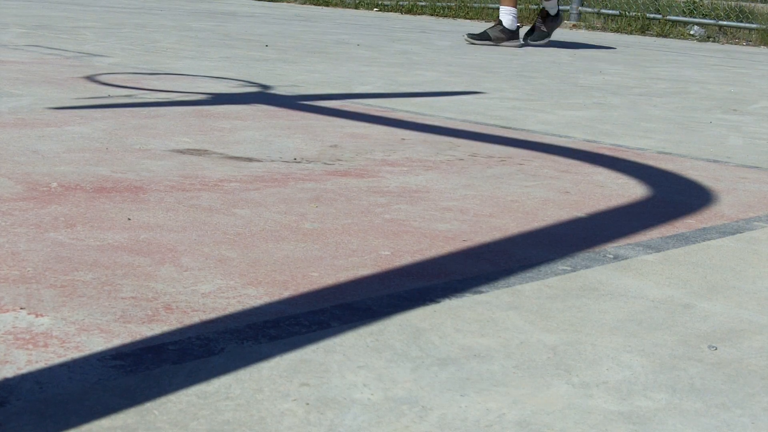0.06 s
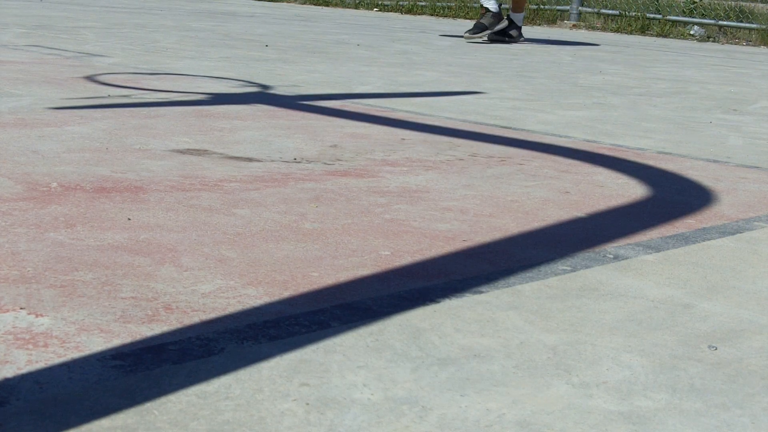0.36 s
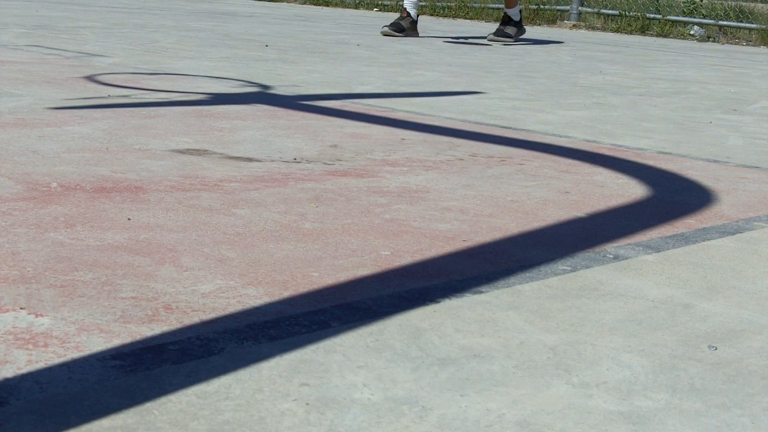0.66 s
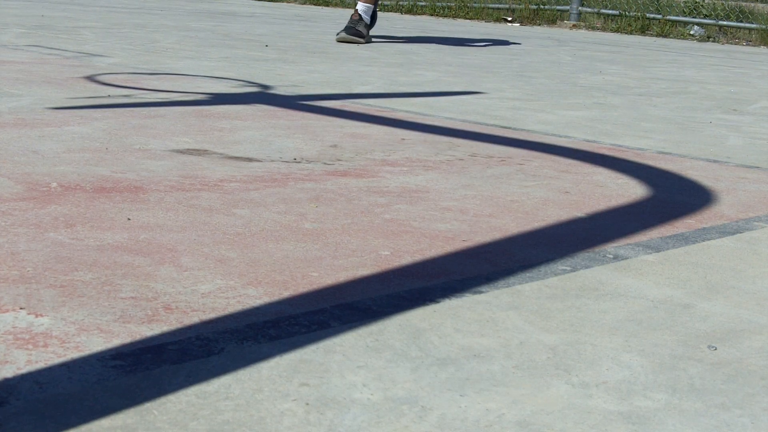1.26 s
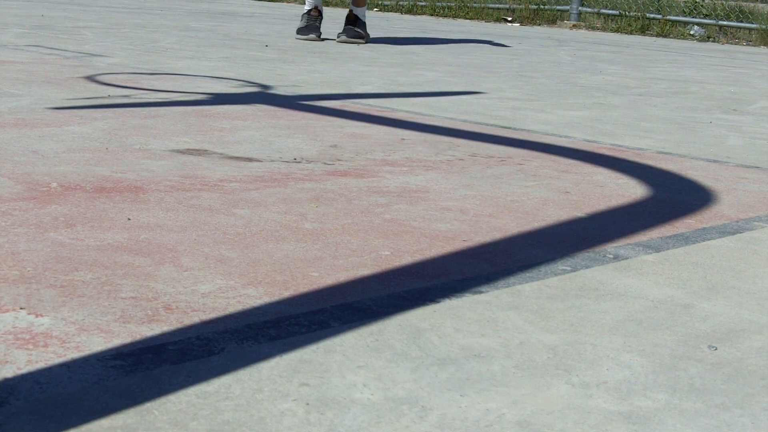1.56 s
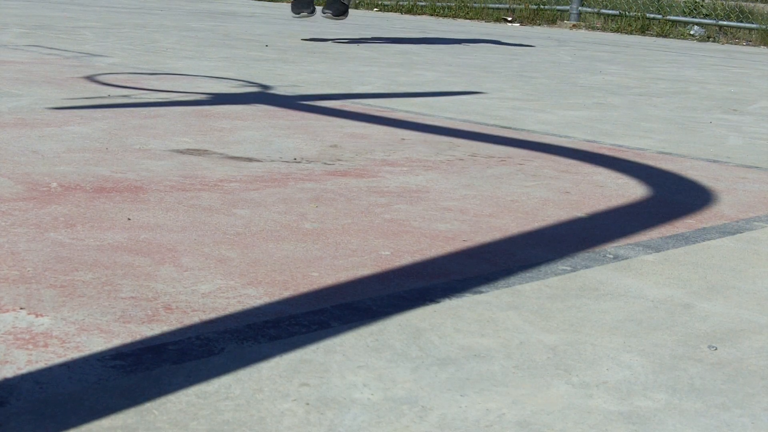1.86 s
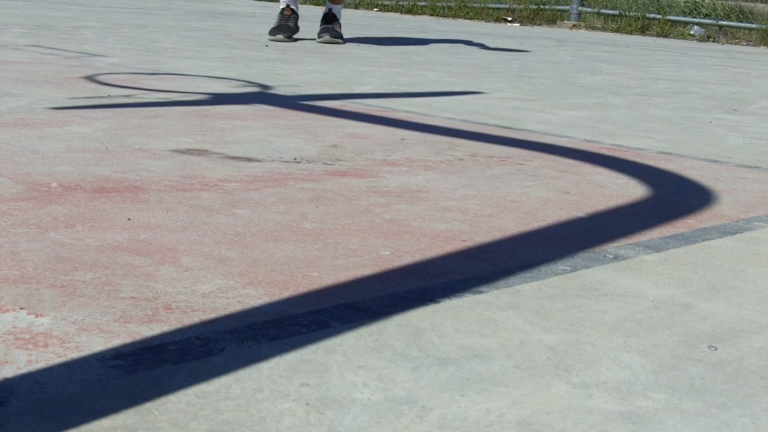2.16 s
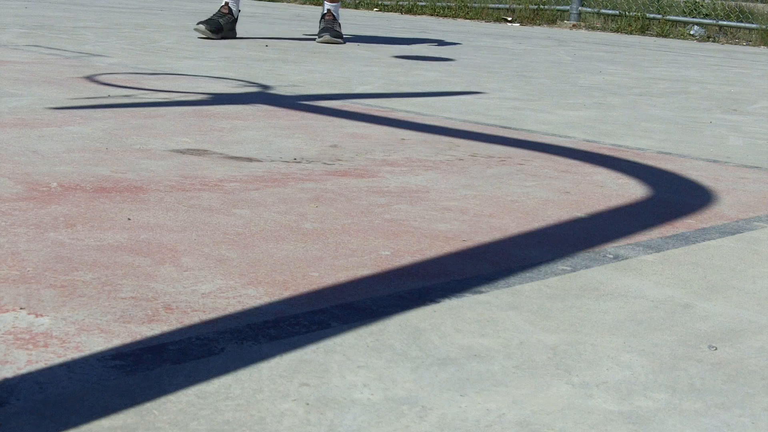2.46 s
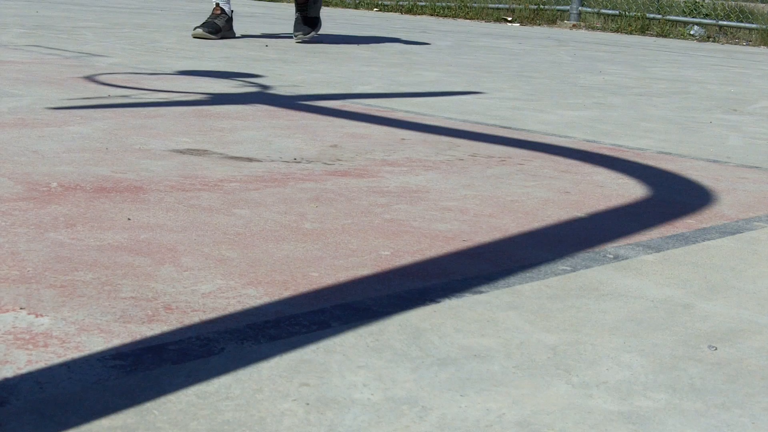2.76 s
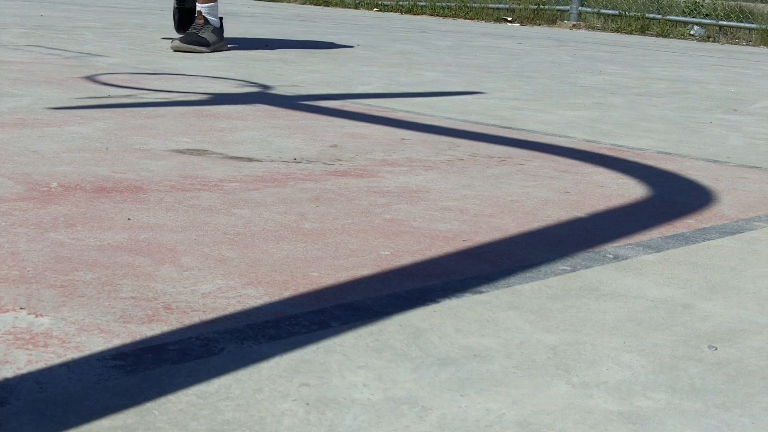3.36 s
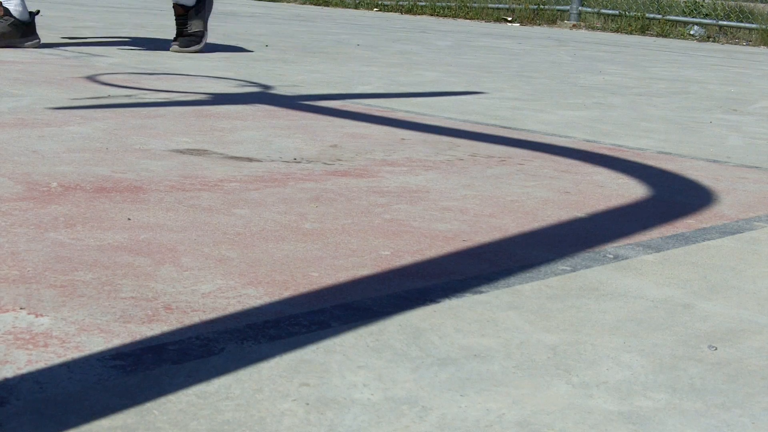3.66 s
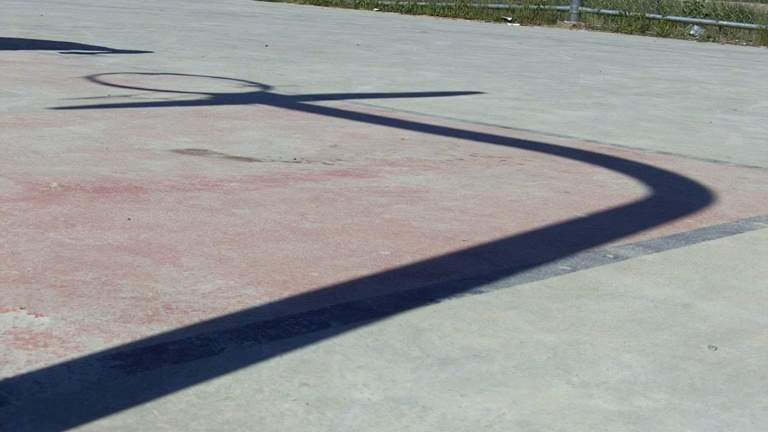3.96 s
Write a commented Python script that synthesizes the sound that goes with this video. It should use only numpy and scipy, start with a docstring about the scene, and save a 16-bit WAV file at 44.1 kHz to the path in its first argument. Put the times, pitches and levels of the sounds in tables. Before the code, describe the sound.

A basketball bounces once, then slams a backboard, leaving the rim rattling in light wind.

```python
"""An outdoor court in light wind: a player steps up, bounces a basketball once, catches it and shoots.
Each impact excites damped modes: first the skin of the ball and the air inside it, then the backboard
and its steel pole, which ring on while the loose rim rattles to and fro.
Wind buffets a nearly mono microphone whose port cuts a deep notch into the treble."""
import sys
import numpy as np
from scipy import signal
from scipy.fft import rfft, irfft, next_fast_len
from scipy.io import wavfile
from scipy.ndimage import map_coordinates

SR = 44100
rng = np.random.default_rng(int(sys.argv[2]) if len(sys.argv) > 2 else 0)


def int16_out(signal):
    """Quantize to a 16-bit WAV file."""
    q = np.round(np.clip(np.atleast_2d(signal).T, -1, 1) * 32767)
    wavfile.write(sys.argv[1], SR, q.astype(np.int16))


N = 176400
TIME = np.arange(N) / SR


def amp(db):
    """Amplitude ratio of a level in decibels."""
    return 10 ** (np.asarray(db) / 20)


def unit(x):
    """Normalisation to rms 1."""
    return x / np.sqrt(np.mean(x ** 2) + 1e-20)


def along(points, hz):
    """Interpolation of (f, value) points on a logarithmic frequency axis."""
    f, v = np.transpose(points)
    return np.interp(np.log(hz + 1), np.log(f + 1), v)


def since(s):
    """Time elapsed since s, zero before it."""
    return np.maximum(TIME - s, 0)


def wobble(rate):
    """Random modulation: a spline through rate knots a second."""
    return map_coordinates(rng.standard_normal(N // 20), [np.arange(N) * rate / SR + 2], order=3)


def filtered(x, response):
    """Linear filtering: the spectrum of x times a frequency response."""
    size = next_fast_len(N + 8192)
    return irfft(rfft(x, size) * response(np.fft.rfftfreq(size, 1 / SR)), size)[..., :N]


def noise(spectrum, shape=lambda hz: 1):
    """Spectral shaping of white noise, at rms 1: spectrum levels are relative."""
    return unit(filtered(rng.standard_normal(N), lambda hz: amp(along(spectrum, hz)) * shape(hz)))


def swells(table):
    """Gaussian envelopes from (t, level, width) rows."""
    return sum(amp(db) * np.exp(-.5 * ((TIME - s) / width) ** 2) for s, db, width in table)


def strike(s, rise, t60):
    """Exponential decay: an envelope that rises at s and falls 60 dB in t60."""
    t = since(s)
    return (1 - np.exp(-t / rise)) * np.exp(-np.log(1000) * t / t60)


def fading(s, spectrum, t60s, rise):
    """Frequency-dependent damping: each band of dense modes decays at its own rate."""
    dense, out = noise(spectrum), np.zeros(N)
    centres, times = np.transpose(t60s)
    for weights, t60 in zip(np.eye(len(times)), times):
        band = filtered(dense, lambda hz: along(np.c_[centres, weights], hz))
        out += band * strike(s, rise, t60)
    return out


def click(s, spectrum):
    """Minimum-phase pulse of peak 1, formed by folding the cepstrum."""
    size = 2048
    cepstrum = irfft(np.log(amp(along(spectrum, np.fft.rfftfreq(size, 1 / SR)))))
    cepstrum[1:size // 2] *= 2
    cepstrum[size // 2 + 1:] = 0
    pulse = irfft(np.exp(rfft(cepstrum)))
    return np.roll(np.pad(pulse / np.abs(pulse).max(), (0, N - size)), round(s * SR))


def impulses(per_s, spread_db):
    """Poisson process: impulses of random sign and log-normal size."""
    sizes = rng.choice([-1, 1], N) * amp(spread_db * rng.standard_normal(N))
    return sizes * (rng.random(N) < per_s / SR)


# wind strength (t/s, relative level/dB)
WIND_STRENGTH = [(0.0, -27), (0.03, -28.5), (0.75, -26.5), (0.78, -41), (0.81, -24.5), (1.22, -27),
                 (1.46, -33.5), (1.97, -24.5), (2.04, -33.5), (2.21, -16.5), (2.37, -34), (2.51, -22),
                 (2.55, -28.5), (2.93, -18), (3.04, -29), (3.55, -19.5), (3.59, -36.5), (4.0, -11.5)]
# buffeting (f/Hz, level/dB)
BUFFET_SPECTRUM = [(10, 10.5), (35, 2), (80, -9.5), (130, -24), (200, -27.5), (400, -45), (1200, -94)]
# single puffs on the port (t/s, level/dB, centre f/Hz)
WIND_PUFFS = [(0.149, -29, 57.6), (0.577, -29, 50.4), (1.102, -26.5, 74), (1.212, -28, 70),
              (1.951, -26.5, 53), (2.197, -16.5, 75), (2.244, -22.5, 70), (2.512, -18.5, 37),
              (2.737, -20.5, 77), (2.781, -28.5, 110.3), (2.843, -18, 162), (2.934, -38, 34),
              (3.434, -16.5, 52.5), (3.533, -16.5, 41.3), (3.75, -20, 45), (3.881, -15.5, 59.4)]

def wind():
    """Turbulent pressure at the microphone: low gusting noise and single puffs."""
    gust_db = np.interp(TIME, *np.transpose(WIND_STRENGTH)) + 1.84 * wobble(8.3) - 3.0
    out = amp(gust_db) * noise(BUFFET_SPECTRUM)
    for s, db, hz in WIND_PUFFS:
        u = (np.pi * hz * (TIME - s)) ** 2
        out += amp(db) * (1 - 2 * u) * np.exp(-u)  # Ricker wavelet
    return out


# background air (f/Hz, level/dB)
AIR_SPECTRUM = [(100, -81), (400, -86), (1000, -90), (2000, -94.5), (3500, -99), (5000, -93.5), (6200, -90),
                (8000, -102), (10000, -111), (15000, -119)]

def air():
    """Stationary broadband noise: a faint, steady hiss."""
    return amp(-53.5) * noise(AIR_SPECTRUM)


# scuffs on concrete (t/s, level/dB, width/s)
SHOE_SCUFFS = [(.04, -53, 0.036), (.44, -55.5, 0.026), (1.645, -48, 0.013), (2.215, -48.5, 0.011),
               (2.41, -56.5, 0.017)]
# grit underfoot (f/Hz, level/dB)
GRIT_SPECTRUM = [(300, -38), (2000, -5.5), (3500, -14), (6300, -0.5), (9000, -11.5), (12000, -24.5),
                 (15000, -38)]

def shoes():
    """Sliding friction: soles brush unevenly over grit."""
    return swells(SHOE_SCUFFS) * amp(1.3 * wobble(300)) * noise(GRIT_SPECTRUM)


# contact pulse, the slap after it and the distant echoes (f/Hz, level/dB)
SMACK_SPECTRUM = [(100, 2), (400, -3), (750, -3), (1200, 5), (1900, -6.5), (3500, -3), (5500, -2),
                  (8000, -22.5), (11000, -36), (15000, -47)]
SLAP_SPECTRUM = [(100, 2.5), (400, -7.5), (1100, -10), (1800, -8.5), (3500, -10), (5700, -9), (8000, -20),
                 (11000, -38), (15000, -44)]
ECHO_SPECTRUM = [(150, -6), (450, -1), (1000, -5), (1600, -15), (4000, -25), (12000, -50)]
# damping of the slap (f/Hz, T60/s)
SLAP_DECAY = [(200, 0.065), (1000, 0.056), (2500, 0.022), (8000, 0.02)]
# modes of the flexing skin and of the enclosed air (f/Hz, level/dB, T60/s)
SKIN_MODES = [(116, -9.5, 0.051), (171, -17, 0.028), (240, -16, 0.061), (415, -20.5, 0.056)]
CAVITY_MODES = [(951, -32, 0.13), (1044, -22, 0.064), (1280, -26, 0.035), (1700, -65, .2),
                (2140, -59, 0.78), (2276, -35, 0.063), (2820, -51, 0.18)]
# reflections from the surroundings (t/s, level/dB, width/s)
DISTANT_ECHOES = [(.816, -41.5, .005), (.925, -53.5, 0.022)]

def dribble(s=0.7763, smack_db=-3, slap_db=-19, echo_delay_s=0.0214):
    """Impulse excitation: the ball hits concrete, its skin and air cavity resonate, echoes follow."""
    t = since(s)
    smack = amp(smack_db) * click(s, SMACK_SPECTRUM)
    slap = amp(slap_db) * fading(s, SLAP_SPECTRUM, SLAP_DECAY, rise=0.00027)
    thump = sum(amp(db) * strike(s, 0.00066, t60) * np.cos(2 * np.pi * hz * t)
                for hz, db, t60 in SKIN_MODES)
    ring = sum(amp(db) * strike(s, 0.00077, t60) * np.sin(2 * np.pi * hz * t)
               for hz, db, t60 in CAVITY_MODES)
    near_echo = amp(slap_db - 17.5) * fading(s + echo_delay_s, SLAP_SPECTRUM, SLAP_DECAY, rise=0.001)
    far_echoes = swells(DISTANT_ECHOES) * noise(ECHO_SPECTRUM)
    return smack + slap + thump + ring + near_echo + far_echoes


# palms catching the ball (t/s, level/dB, T60/s, cutoff f/Hz)
CATCHES = [(1.303, -33, 0.052, 1320), (1.309, -44, 0.032, 1400), (1.3123, -34, 0.072, 1000)]
# pats before the shot (t/s, peak level/dB)
HAND_PATS = [(2.1972, -16), (2.202, -19.5)]
# a catch and a pat (f/Hz, level/dB)
PALM_SPECTRUM = [(100, -7), (450, 8.5), (750, -6.5), (1200, 1), (3000, -5), (6500, 3), (15000, -29)]
PAT_SPECTRUM = [(100, 7), (400, -4), (900, 3.5), (1500, -6), (2400, -14), (4000, -31), (7000, -22),
                (10000, -34), (15000, -54)]

def hands(crack_db=-19):
    """Heavily damped impacts: a dull catch with a thin crack, later two sharp pats."""
    catch = np.zeros(N)
    for s, db, t60, cutoff in CATCHES:
        palm = noise(PALM_SPECTRUM, lambda hz: 1 / (1 + (hz / cutoff) ** 6) + amp(crack_db))
        catch += amp(db) * strike(s, 0.00012, t60) * palm
    return catch + sum(amp(db) * click(s, PAT_SPECTRUM) for s, db in HAND_PATS)


# rustles of the throw (t/s, level/dB, width/s)
THROW_RUSTLES = [(2.3, -51.5, 0.022), (2.38, -54.5, 0.021)]
# rubbing cloth (f/Hz, level/dB)
CLOTH_SPECTRUM = [(300, 4), (1200, -11), (1800, 2.5), (2600, -20), (6000, -22), (12000, -38)]

def clothes():
    """Friction noise: cloth rustles faintly as the arms go up."""
    return swells(THROW_RUSTLES) * noise(CLOTH_SPECTRUM)


# the blow, then the board chattering on its mount (t/s, level/dB, T60/s, tilt/(dB per octave))
BOARD_BLOWS = [(2.9062, -9.5, 0.13, -7), (2.916, -19.5, 0.11, 3.5), (2.936, -16.5, 0.27, -2),
               (2.95, -15.5, 0.061, -1), (2.978, -19, 0.2, -3), (3.041, -23.5, 0.3, -4),
               (3.099, -24, 0.28, -1.5), (3.151, -32.5, 0.48, -6.5)]
# the struck board (f/Hz, level/dB)
CRASH_SPECTRUM = [(80, -3), (170, -9), (310, -5.5), (420, 3.5), (490, -20), (580, 4.5), (680, -7), (790, 2),
                  (930, -6.5), (1100, -1), (1480, -5), (1650, -10), (1900, 6), (2150, -9), (2500, -4.5),
                  (3600, -16), (6500, -13), (9000, -28), (15000, -55)]
HIT_S = BOARD_BLOWS[0][0]

def backboard(graze_lead_s=0.0059):
    """Broadband impact noise: the ball grazes, then slams the board, which knocks on its mount."""
    crash = np.zeros(N)
    for s, db, t60, tilt in BOARD_BLOWS:
        blow = noise(CRASH_SPECTRUM, lambda hz: amp(tilt * np.log2(np.clip(hz, 400, 2500) / 1000)))
        crash += amp(db) * strike(s, 0.00016, t60) * blow
    graze = amp(-24) * strike(HIT_S - graze_lead_s, 0.0055, 0.066) * noise(CRASH_SPECTRUM)
    return graze + crash


def modes(table, rise, waver_db, drift_rad, rate):
    """Modal superposition: damped sinusoids whose level and phase waver as the hoop shakes."""
    t, out = since(HIT_S), np.zeros(N)
    for hz, db, t60 in table:
        envelope = amp(db + waver_db * wobble(rate)) * strike(HIT_S, rise, t60)
        phase = 2 * np.pi * (hz * t + rng.random()) + drift_rad * wobble(rate)
        out += envelope * np.sin(phase)
    return out


# modes of the steel pole and of the board (f/Hz, relative level/dB, T60/s)
POLE_MODES = [(204.4, -18.5, 7.6), (241.8, -22, 2.75), (292, -30, 1.8), (418.7, -21.5, 2.4),
              (442.3, -29.5, 8.4), (481, -27.5, 12), (542, -26.5, 5.4), (595, -15.5, 2.1),
              (715, -32.5, 6.5), (800, -23.5, 2.3), (822, -43, 7.5)]
BOARD_MODES = [(1060, -29.5, 4.2), (1050, -21, 0.67), (1192, -31.5, 1.3), (1290, -30.5, 3.8),
               (1497, -32, 3.1), (1438, -25, 0.75), (1840, -25, 0.78), (1820, -42, 1.254),
               (1904, -18, 0.98), (2010, -39, 1.2), (1957, -37.5, 6.1), (2428, -31.5, 3.1),
               (2655, -49, 2.8)]
# dense modes of the whole frame (f/Hz, level/dB) and their damping (f/Hz, T60/s)
FRAME_SPECTRUM = [(100, 6), (170, 3), (330, -9.5), (600, 2), (820, 8.5), (950, -4.5), (1300, 8),
                  (1650, -15.5), (1900, 6.5), (2150, -8.5), (2450, -5), (3500, -12.5), (6500, -10),
                  (9000, -19.5), (15000, -43.5)]
FRAME_DECAY = [(200, 10.5), (1000, 2.24), (2500, 2.85), (6500, 1.8), (12000, 1.9)]
# rim swings, which drive both frame and rim (t/s, relative level/dB, rim resonance gain/dB)
RIM_SWINGS = [(2.934, -52, -17), (3.159, -40, 7), (3.235, -64, -4), (3.305, -39, 9.5), (3.383, -38.5, -1),
              (3.45, -41.5, 7.5), (3.526, -39.5, 5), (3.603, -37, 6.5), (3.671, -38.5, 2), (3.738, -38, -5),
              (3.82, -46, 5), (3.896, -44.5, 7), (3.971, -40, -13)]

def frame_ring(rise=0.007, settle_db=11, settle_s=0.27, feed_db=17.5):
    """Coupled vibration: pole, board and frame lose energy fast at first; each rim swing feeds them."""
    frame = amp(-17.5) * fading(HIT_S, FRAME_SPECTRUM, FRAME_DECAY, rise)
    pole = modes(POLE_MODES, rise, waver_db=3, drift_rad=0.31, rate=11)
    board = modes(BOARD_MODES, rise, waver_db=5, drift_rad=0.53, rate=24)
    settle = amp(-settle_db * (1.5 - np.exp(-since(HIT_S) / settle_s)))
    feed = sum(amp(db + feed_db) * strike(s, rise=0.03, t60=1) for s, db, _ in RIM_SWINGS)
    return (frame + pole + board) * (settle + feed)


# ticks of loose metal (f/Hz, level/dB)
TICK_SPECTRUM = [(400, -21), (1900, -14), (3200, 14), (5000, -12), (6800, 9), (9000, -5), (12000, -23),
                 (15000, -30)]

def metal_chatter():
    """Shot noise: tiny ticks of loose metal, fading as the hoop calms."""
    ticks = impulses(per_s=270, spread_db=1.6)
    ring = noise(TICK_SPECTRUM) * strike(0, rise=0.0001, t60=0.03)
    chatter = unit(signal.fftconvolve(ticks, ring)[:N])
    return amp(-44.5) * strike(HIT_S, rise=0.011, t60=4.4) * chatter


# dense modes of the rim (f/Hz, level/dB)
RIM_SPECTRUM = [(200, 21), (550, 10), (1000, -1), (1350, 7.5), (1650, -2.5), (1950, 8), (2200, 1.5),
                (2650, 0), (3800, 0), (5500, -4), (6400, -3.5), (6850, 2), (7600, -8.5), (10000, -15.5),
                (15000, -43)]
# its narrow resonances (f/Hz, half width/Hz, relative level/dB)
RIM_RESONANCES = [(6570, 30, -11.5), (6670, 40.4, -12.5), (7140, 41, -14), (2750, 14, -32), (3840, 12, -12)]

def rim_rattle():
    """Convolution: each swing's taps excite the same rim response, while narrow resonances whine."""
    swings = sum(amp(db) * strike(s, rise=0.001, t60=0.45) for s, db, _ in RIM_SWINGS)
    taps = unit(impulses(per_s=800, spread_db=1.25))
    ring = noise(RIM_SPECTRUM) * strike(0, rise=0.0001, t60=0.026)
    buzz = amp(6.5) * signal.fftconvolve(swings * taps, ring / np.linalg.norm(ring))[:N]
    singing = sum(amp(db + gain_db) * strike(s, rise=0.0017, t60=0.27) for s, db, gain_db in RIM_SWINGS)
    whine = np.zeros(N)
    for hz, width, db in RIM_RESONANCES:
        band = filtered(rng.standard_normal(N), lambda f: 1 / (1 + ((f - hz) / width) ** 2))
        whine += amp(db) * singing * unit(band)
    return buzz + whine


# late clinks at the rim (t/s, level/dB, T60/s)
RIM_CLINKS = [(3.757, -25.5, 0.054), (3.775, -30.5, 0.12), (3.785, -45.5, 0.28)]
# a clink (f/Hz, level/dB)
CLINK_SPECTRUM = [(300, -0.5), (2000, -5), (3000, 3.5), (4500, -3.5), (6000, 7.5), (7500, -3),
                  (10500, -12.5), (15000, -29)]

def rim_clinks():
    """Hard, brief contact gives a wide spectrum: the rim clinks sharply."""
    envelope = sum(amp(db) * strike(s, 0.00026, t60) for s, db, t60 in RIM_CLINKS)
    return envelope * noise(CLINK_SPECTRUM)


# faint low wind rumble in the side channel, with a trace of hiss (f/Hz, level/dB)
SIDE_SPECTRUM = [(30, 36), (100, -15.5), (400, -22.5), (2000, -38.5), (4000, -39), (6000, -37),
                 (13000, -29.5)]

def scene():
    """Mid-side stereo: central sources; the side holds faint wind rumble and a little mid in quadrature."""
    player = shoes() + dribble() + hands() + clothes()
    hoop = backboard() + frame_ring() + metal_chatter() + rim_rattle() + rim_clinks()
    mid = wind() + air() + player + hoop
    side = amp(-50) * noise(SIDE_SPECTRUM) + amp(-59.5) * np.imag(signal.hilbert(mid))
    return np.array([mid + side, mid - side])


def record(dry, notch_hz=4230, notch_width_hz=1400, top_hz=15200):
    """Antiresonance: the microphone port cancels one band; a steep low-pass limits the treble."""
    def response(hz):
        detuning = notch_hz ** 2 - hz ** 2
        port = detuning / (detuning + 1j * hz * notch_width_hz)
        return port / np.sqrt(1 + (hz / top_hz) ** 80)
    return filtered(dry, response)


dry = scene()
out = record(dry)
int16_out(out)
```